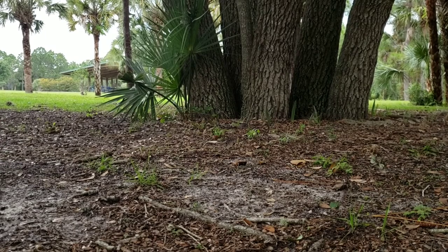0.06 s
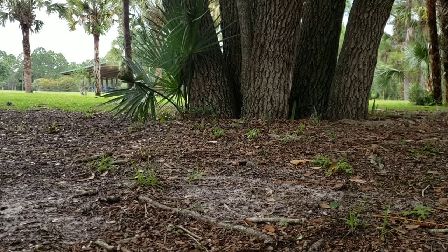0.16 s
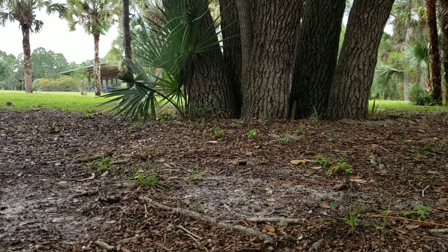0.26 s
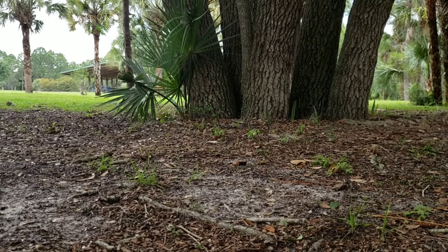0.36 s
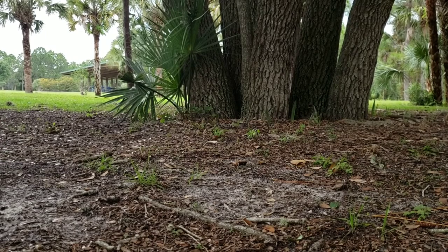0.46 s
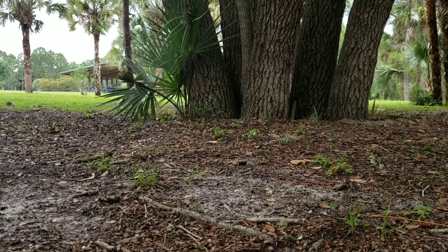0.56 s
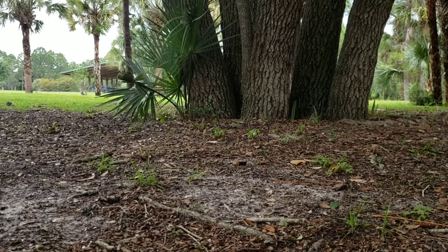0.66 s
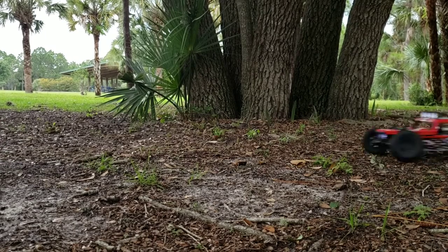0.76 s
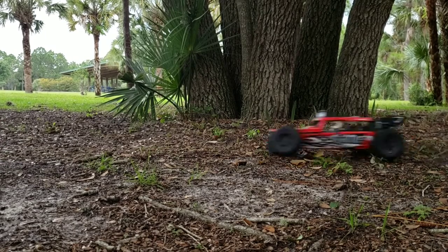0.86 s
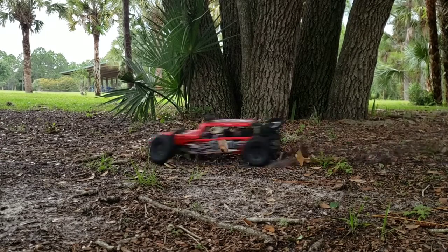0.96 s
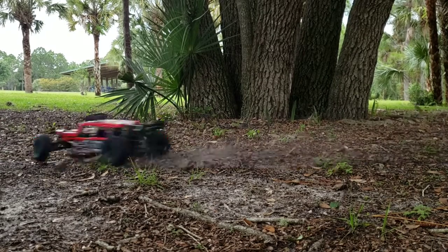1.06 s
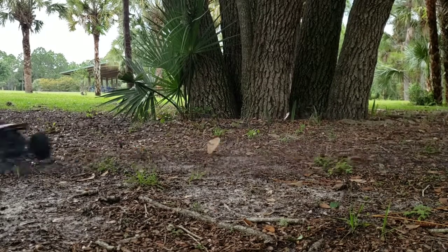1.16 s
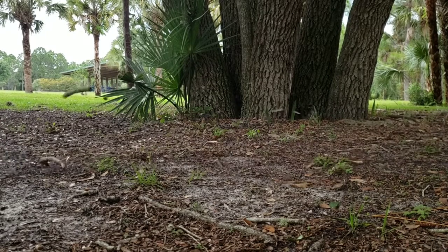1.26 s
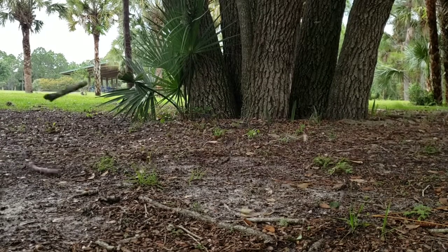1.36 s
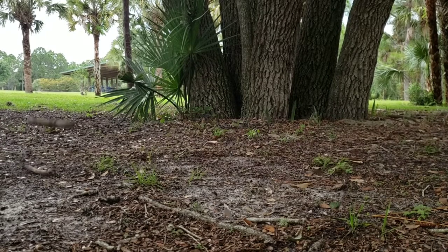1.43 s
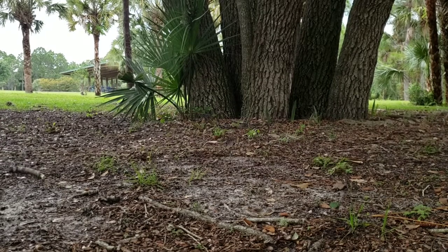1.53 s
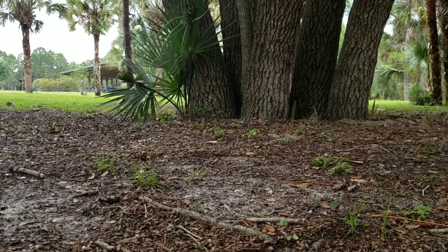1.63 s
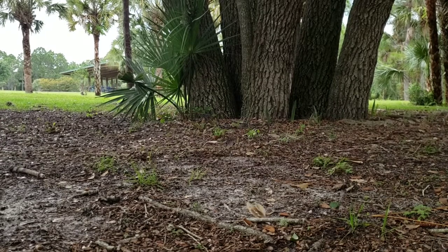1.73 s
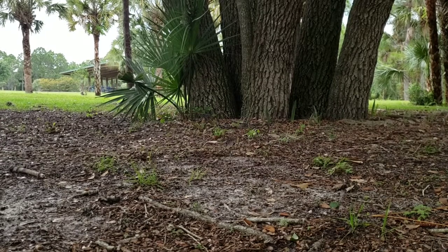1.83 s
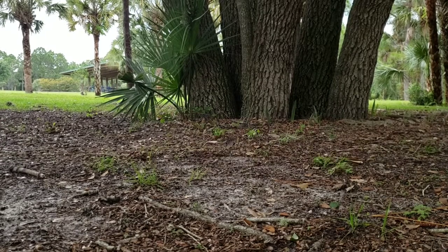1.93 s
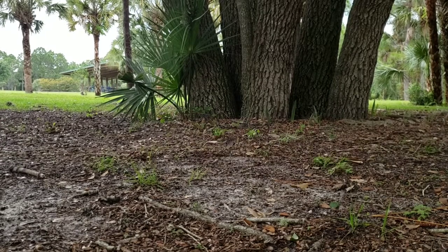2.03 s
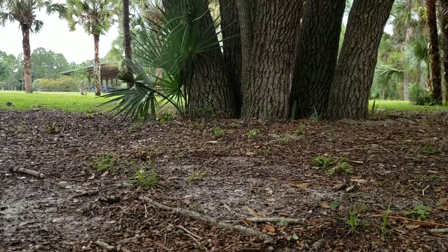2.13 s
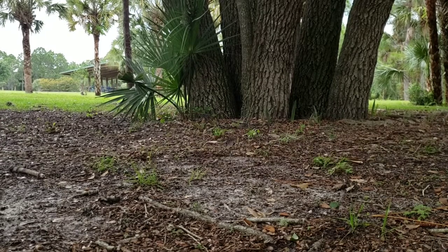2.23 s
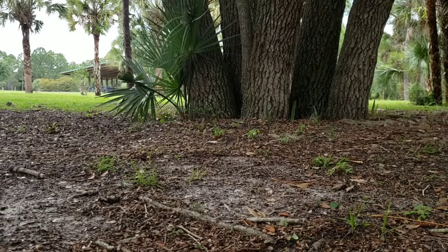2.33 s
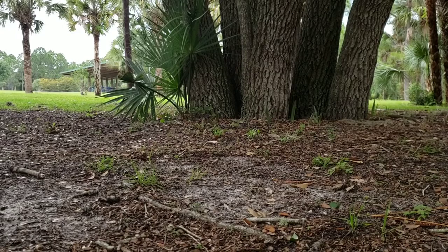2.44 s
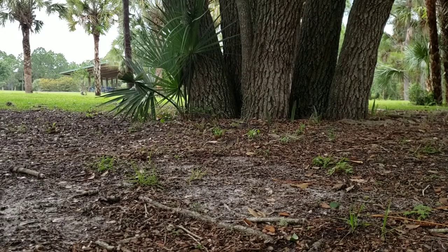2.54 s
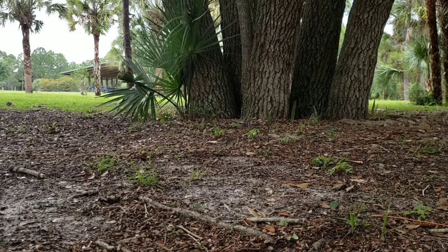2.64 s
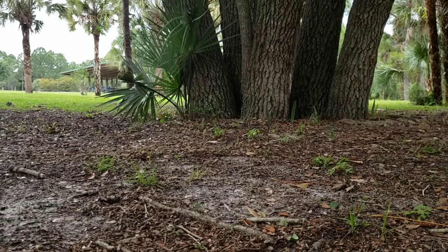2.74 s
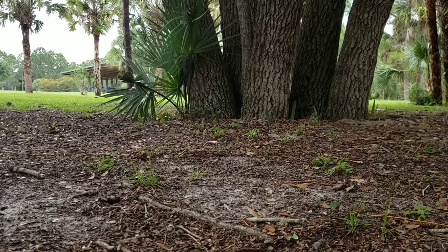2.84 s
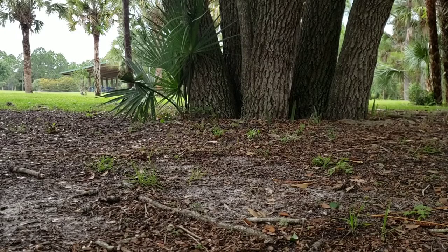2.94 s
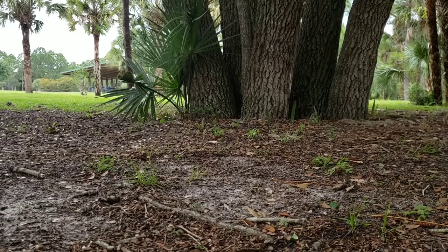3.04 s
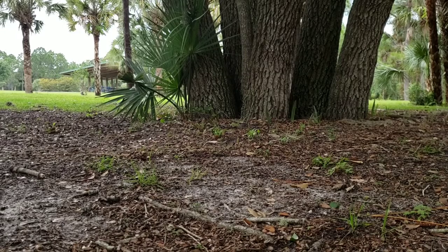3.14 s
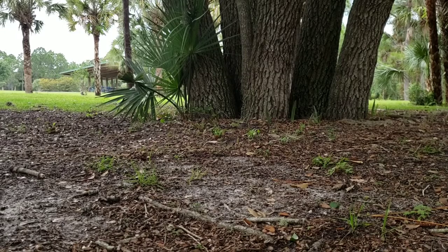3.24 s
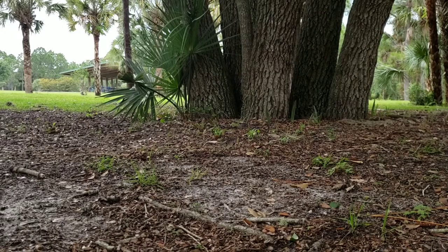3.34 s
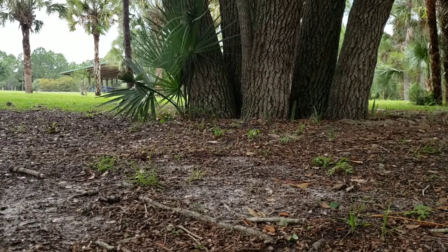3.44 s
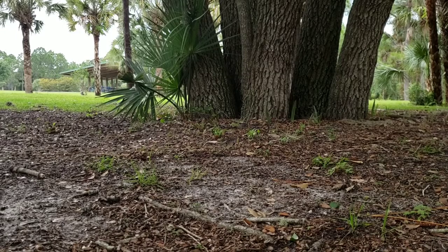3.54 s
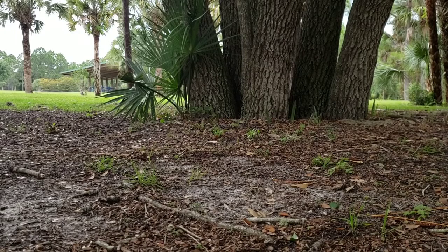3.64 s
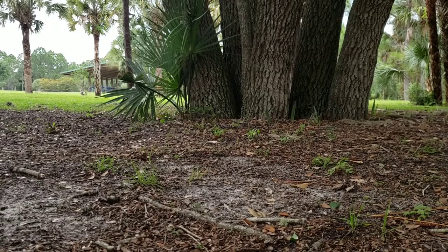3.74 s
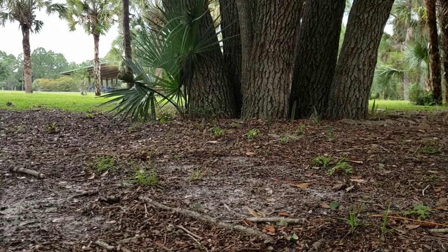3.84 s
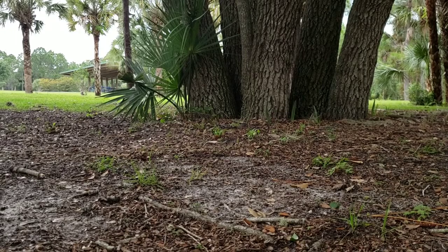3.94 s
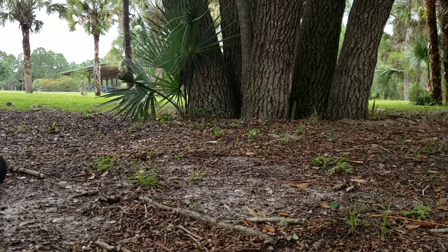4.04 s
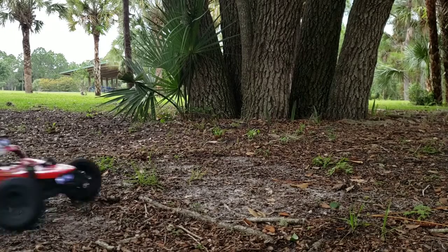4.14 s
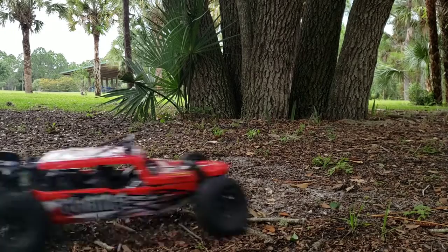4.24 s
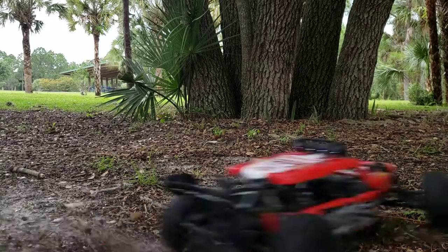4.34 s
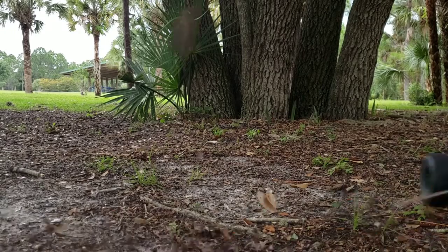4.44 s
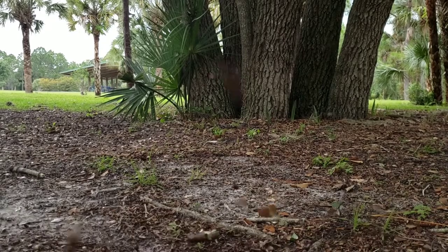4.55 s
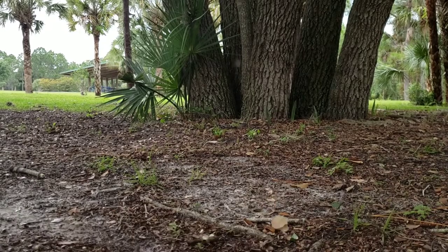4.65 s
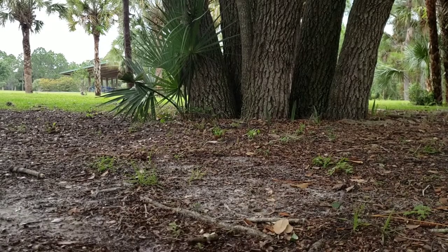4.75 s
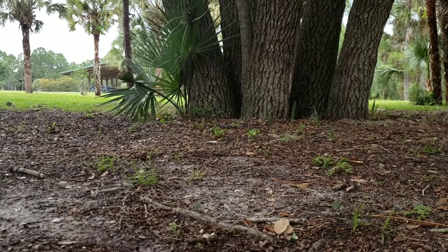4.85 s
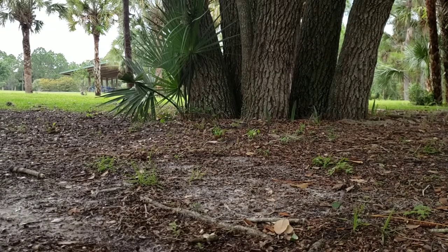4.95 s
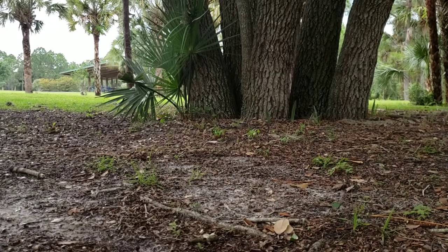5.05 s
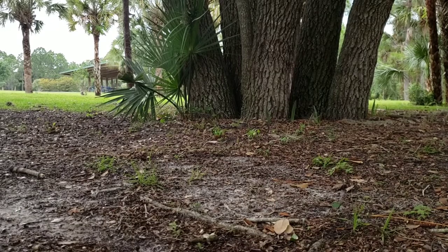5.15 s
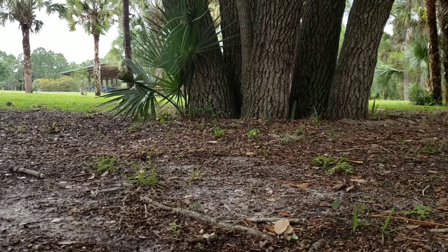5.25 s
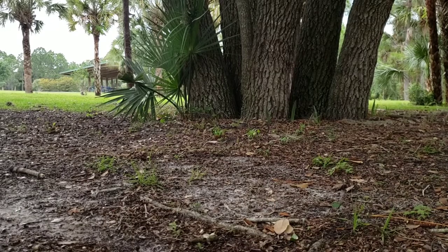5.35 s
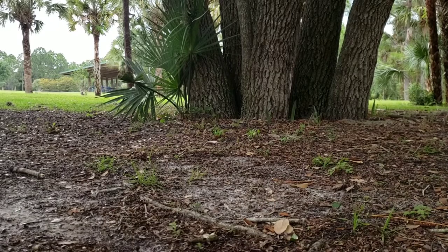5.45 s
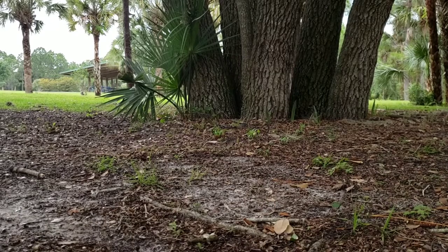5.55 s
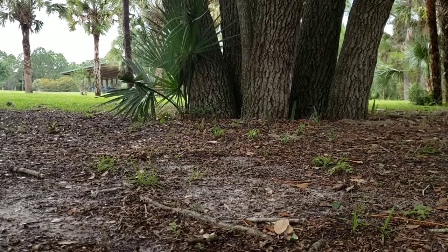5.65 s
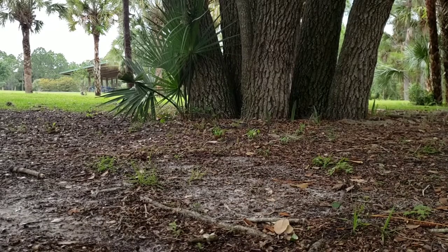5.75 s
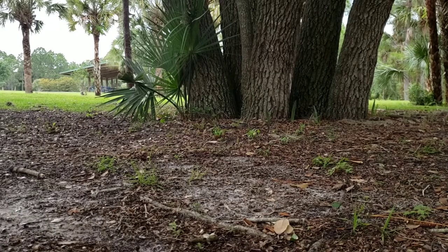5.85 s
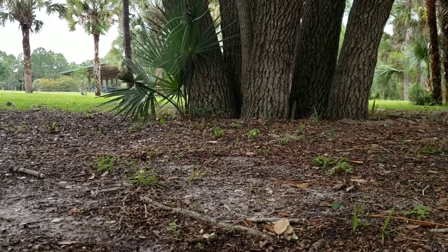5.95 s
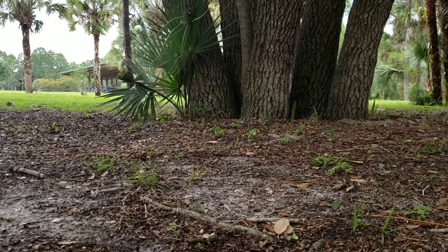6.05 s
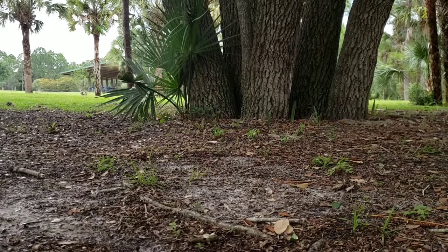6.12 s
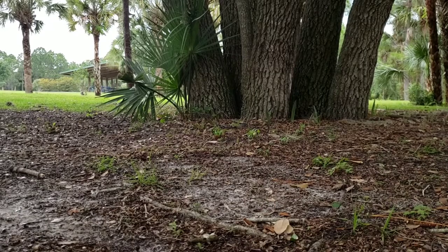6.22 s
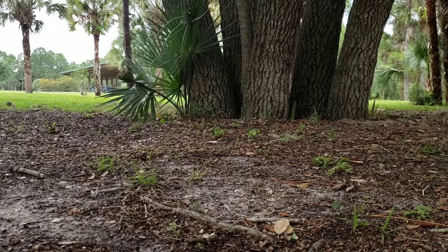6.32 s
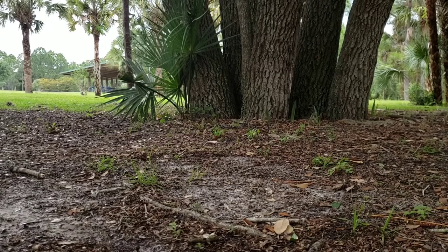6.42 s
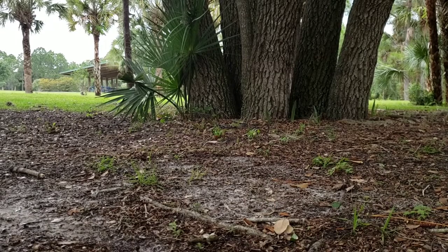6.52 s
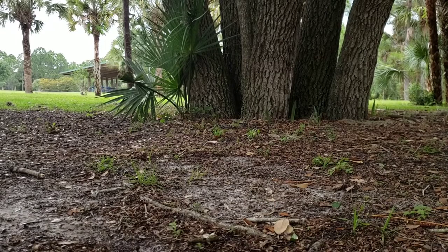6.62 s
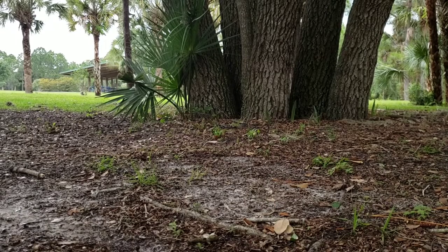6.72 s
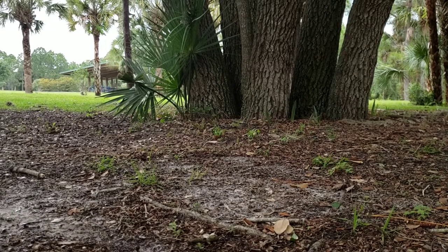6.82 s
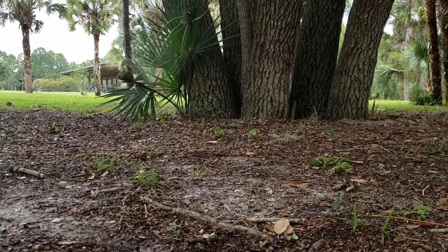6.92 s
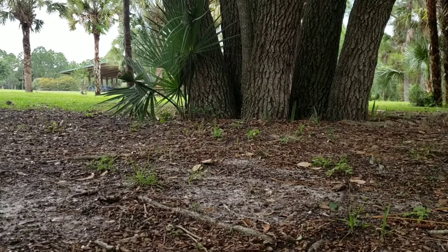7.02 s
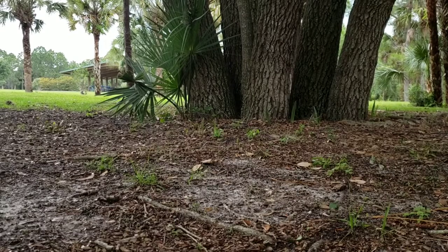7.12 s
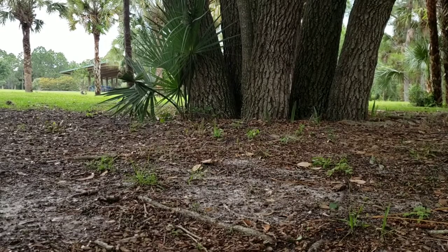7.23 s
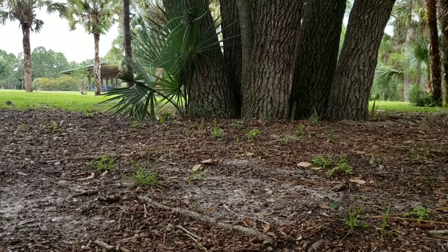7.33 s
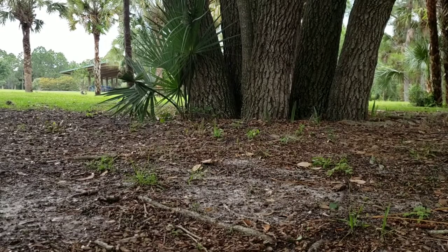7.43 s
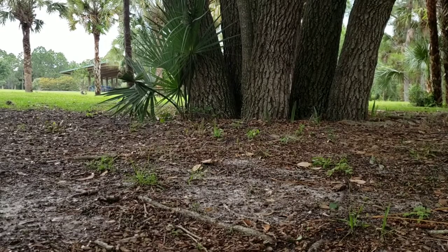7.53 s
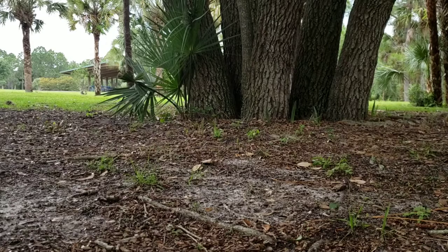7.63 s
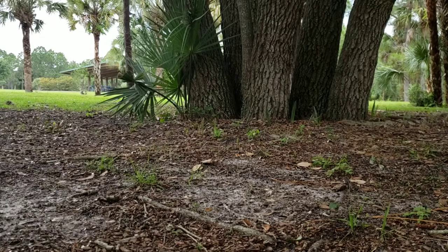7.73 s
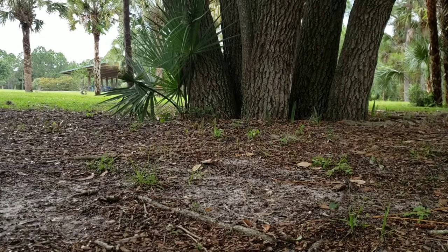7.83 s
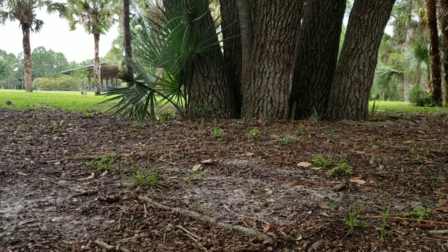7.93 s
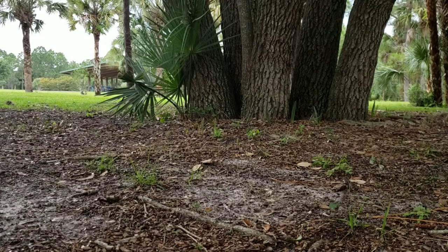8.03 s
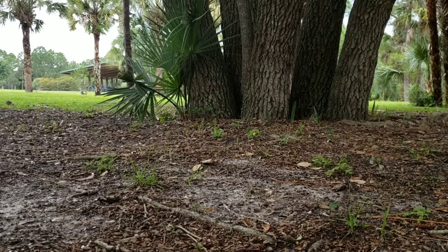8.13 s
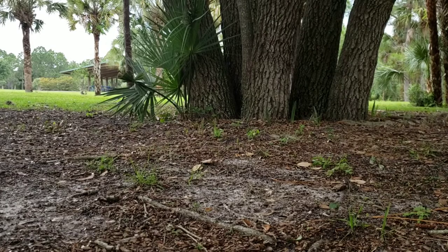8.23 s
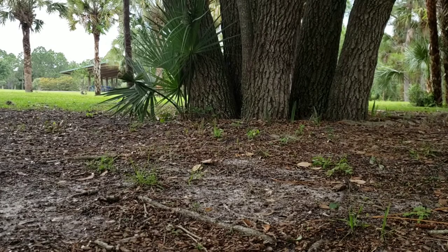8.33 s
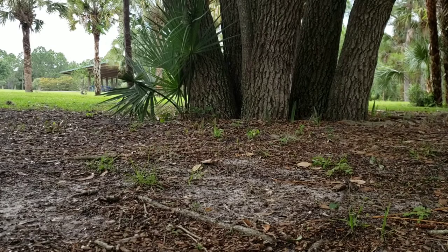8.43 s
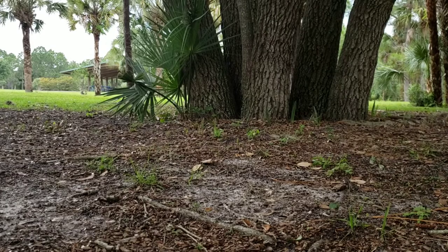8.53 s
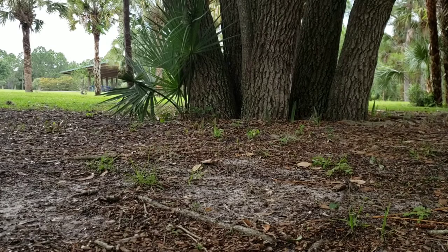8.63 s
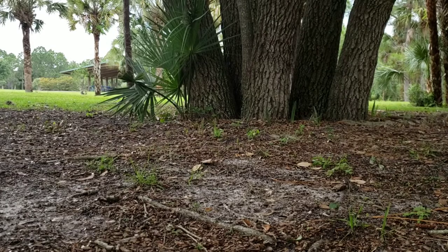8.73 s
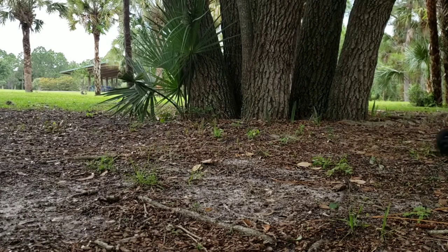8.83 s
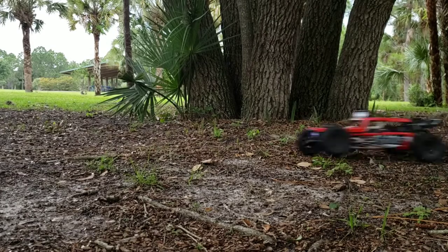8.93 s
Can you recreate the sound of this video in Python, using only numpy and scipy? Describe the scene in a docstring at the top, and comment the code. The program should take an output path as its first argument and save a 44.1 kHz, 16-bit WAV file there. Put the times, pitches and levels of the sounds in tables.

```python
"""A small electric buggy races over sandy leaf litter near a low microphone; far off an engine drones.
It passes at 1 s: gear whine, speed-controller whistle, churning tyres, flung grit. It returns and passes
closer at 4.4 s, and a clod thumps the right microphone port. Crumbs and loose dirt settle in the lull.
At 6.9 s the sound drops out for a moment, then the buggy approaches a third time."""
import sys
import numpy as np
from scipy import signal
from scipy.fft import rfft, irfft, next_fast_len
from scipy.io import wavfile
from scipy.ndimage import uniform_filter1d, map_coordinates

SR = 44100
rng = np.random.default_rng(int(sys.argv[2]) if len(sys.argv) > 2 else 0)


def output_pcm(signal):
    """Save a mono or channel-first signal as 16-bit PCM at the path in sys.argv[1].

    Samples are clipped to [-1, 1] before scaling.
    """
    pcm = np.clip(np.atleast_2d(signal).T, -1, 1) * 32767
    wavfile.write(sys.argv[1], SR, np.round(pcm).astype(np.int16))


N = 396018
TIME_S = np.arange(N) / SR
PORT_LAG_S = 21 / 44100
GRAIN_HOLD = .975  # share of a grain's envelope kept per sample

# gear mesh, one list per approach: (time [s], pitch [Hz], level [dB], second harmonic [dB])
GEAR_MESH = [
    [(0.0, 668.6, -39, -46), (0.13, 787, -43, -50), (0.25, 996, -39.5, -42), (0.41, 1243, -37, -43.5),
     (0.435, 1554, -29, -60), (0.447, 1910, -44, -57), (0.457, 2207, -30, -57), (.485, 2207, -34, -55),
     (0.495, 1444, -28, -50), (.53, 1812, -35.5, -36), (.545, 2177, -28, -48), (0.58, 2424, -38, -50),
     (0.67, 2515, -38, -42), (0.8, 2490, -35, -45), (0.89, 2450, -35, -41), (0.93, 2526, -45, -46),
     (1.0, 2639, -44, -35), (1.07, 2370, -31, -32), (1.12, 2447, -34, -36), (1.17, 2658, -48, -41),
     (1.2, 2610, -46, -42), (1.23, 2550, -44, -32), (1.27, 2480, -34, -40), (1.35, 2342, -45, -53)],
    [(2.44, 400.6, -62, -73), (2.485, 642, -52, -68), (2.53, 1159, -39.5, -59), (2.57, 1200, -51, -68),
     (2.62, 1270, -43, -68), (2.68, 1400, -36, -72), (2.72, 1750, -43, -70), (2.78, 1948, -53, -69),
     (2.81, 2055, -64, -72), (2.88, 2274, -66, -70), (2.92, 2390, -54, -70), (3.2, 2502, -54, -76),
     (3.39, 2434, -48, -72), (3.42, 2128, -48, -72), (3.46, 2874, -44, -70), (3.6, 1953, -34.5, -60),
     (3.7, 2400, -39, -66), (3.73, 1522, -45, -60.5), (3.8, 1750, -37, -52), (3.825, 1444, -46, -36),
     (3.89, 1847, -37, -35), (3.91, 2150, -27, -46), (3.94, 2420, -31, -40), (3.975, 2400, -38, -42),
     (3.99, 2292, -29, -34), (4.04, 2319, -28.5, -32), (4.13, 2675, -43, -29), (4.2, 2581, -34, -34),
     (4.25, 2403, -27.5, -35), (4.28, 2520, -36, -35), (4.33, 2600, -28, -25), (4.355, 2547, -30.5, -27),
     (4.372, 2330, -30.5, -23.5), (4.39, 2500, -32.5, -18.5), (4.41, 2605, -31, -32),
     (4.435, 2374, -25, -32), (4.47, 2407, -32.5, -26), (4.5, 2610, -40, -25.5), (4.53, 2560, -41, -36),
     (4.56, 2445, -48, -52)],
    [(6.915, 1534, -39, -64), (6.999, 1471, -51, -63), (7.029, 1476, -42, -62), (7.041, 1582, -45, -62),
     (7.103, 1431, -40, -62), (7.149, 1651, -49, -62), (7.163, 1500, -41, -62), (7.203, 1547, -54, -62),
     (7.211, 1431, -50, -62), (7.259, 1510, -39, -62), (7.309, 1629, -48, -62), (7.321, 1757, -44, -62),
     (7.367, 1603, -42, -62), (7.389, 1748, -42.5, -60), (7.451, 1528, -39.5, -62), (7.493, 1761, -42, -62),
     (7.519, 1662, -40, -62), (7.585, 1797, -44, -62), (7.601, 1711, -40.5, -57), (7.645, 1784, -42, -59),
     (7.685, 1949, -55, -62), (7.737, 1787, -39, -60), (7.765, 1924, -49, -58), (7.779, 1789, -46, -62),
     (7.795, 1985, -49, -64), (7.837, 1989, -44, -65), (7.845, 1727, -30, -62),
     (7.86, 1956, -49, -66)] + [(8.02, 2350, -42, -68), (8.2, 2302, -52, -66), (8.32, 2299, -38, -66),
     (8.37, 1904, -54, -66), (8.4, 1534, -34, -64), (8.52, 1250, -38, -42), (8.65, 1583, -38.5, -51),
     (8.8, 1542, -37, -60), (8.98, 1549, -38.5, -63)],
]


def amp(db):
    return 10 ** (np.asarray(db) / 20)


def unit(x):
    return x / np.sqrt(np.mean(x ** 2) + 1e-20)


def along(points, hz):
    """Interpolate (frequency [Hz], value) points on a log axis."""
    f, v = np.transpose(points)
    return np.interp(np.log(hz + 1), np.log(f + 1), v)


def curves(rows):
    """One value per sample for each column after the time."""
    s, *cols = np.transpose(rows)
    return [np.interp(TIME_S, s, c) for c in cols]


def span(start_s, end_s, fade_s=0.029):
    """1 inside the span, fading to 0 outside."""
    return np.clip(np.minimum(TIME_S - start_s, end_s - TIME_S) / fade_s + 1, 0, 1)


def wobble(rate_hz):
    """Smooth random curve with knots at rate_hz."""
    coarse = np.arange(0, N + 16, 16)
    knots = rng.standard_normal(int(N * rate_hz / SR) + 5)
    return np.interp(np.arange(N), coarse, map_coordinates(knots, [coarse * rate_hz / SR]))


def fuzz(width_hz):
    """Wandering complex gain, rms near 1: spreads a line into a band."""
    knots = rng.standard_normal((int(N * width_hz / SR) + 2, 2)) @ [1, 1j]
    return np.interp(TIME_S * width_hz, np.arange(len(knots)), knots) / 1.15


def filtered(x, response):
    m = next_fast_len(N + SR // 4)
    return irfft(rfft(x, m) * response(np.fft.rfftfreq(m, 1 / SR)), m)[..., :N]


def coloured(x, spectrum):
    """Filter by (frequency [Hz], gain [dB]) points."""
    return filtered(x, lambda hz: amp(along(spectrum, hz)))


def heading():
    """Bearing of a car on straight runs: sideways over full distance, -1 left to 1 right."""
    # sweeps: (middle [s], half width [s], bearing after)
    moves = [(.988, .33, -.82), (3.95, .3, -.6), (4.41, .12, 1.02), (5.65, .05, 0), (6.895, .002, .97),
             (9.0, .2, -.6)]
    start = .95
    before = [start] + [row[2] for row in moves]
    return start + sum((after - was) * (.5 + .5 * (TIME_S - s) / np.hypot(TIME_S - s, half_s))
                       for (s, half_s, after), was in zip(moves, before))


def at_ports(streams, alike, shade_db):
    """Common stream 0 reaches the far port late; the housing shades the left port from the right."""
    bearing = heading()
    lag = bearing * PORT_LAG_S * SR / 2
    common = np.array([map_coordinates(streams[0], [np.arange(N) - k * lag], order=3) for k in (1, -1)])
    pair = np.sqrt(alike) * common + np.sqrt(1 - alike) * streams[1:]
    shade = shade_db * np.clip(0.35 + bearing, 0, 1.2)
    return pair * amp([-.7 * shade, 0.47 * shade])


def surroundings():
    """Far engine with a half order, traffic rumble, a faint tone in the lull and thin air hiss."""
    # far engine, two stretches: (time [s], firing rate [Hz], engine [dB], traffic [dB])
    drone = [
        [(0.0, 78.6, -49.5, -41.5), (0.5, 94.4, -57, -45), (1.2, 98, -60, -40.5), (1.8, 75.3, -61, -45),
         (2.5, 84, -55.5, -52.5), (3.4, 84.3, -56, -45), (3.68, 75.9, -46.5, -47.5), (3.97, 97.27, -48, -42.5),
         (4.45, 96, -51.5, -35.5)],
        [(4.62, 66.9, -67, -61), (4.96, 74.45, -63.5, -67), (5.78, 77.5, -60, -63.5),
         (7.0, 77.84, -51.5, -47.5), (7.6, 77.93, -53.5, -43.5), (7.86, 93, -54, -46), (8.2, 73.2, -63, -43),
         (8.98, 80.1, -52, -37)],
    ]
    # traffic spectrum: (frequency [Hz], gain [dB])
    traffic_spectrum = [(12, -85), (20, -45), (60, -8.5), (80, -11.5), (103, -13), (160, -15.5),
                        (400, -35.5), (520, -86.5), (880, -120)]
    # air spectrum: (frequency [Hz], gain [dB])
    air_spectrum = [(150, -34.5), (250, -13), (450, -27.5), (900, -37), (2500, -46), (5500, -29.5),
                    (8400, -43), (12300, -29.5), (16200, -35.5)]
    firing_hz, engine_db, traffic_db = curves(sum(drone, []))
    crank = np.pi * np.cumsum(firing_hz * (1 + 0.013 * wobble(6.6))) / SR
    engine = sum(amp(engine_db + db + 1.8 * wobble(11)) * np.sin(k * crank)
                 for k, db in zip((2, 3, 4, 6), (3.5, -11.5, -19.0, -20.5)))
    traffic = amp(traffic_db - 4.5) * unit(coloured(rng.standard_normal(N), traffic_spectrum))
    tone_db = 0.35 * traffic_db - 66.5 + 1.3 * wobble(17)
    tone = amp(tone_db) * np.sin(2 * np.pi * 1755 * TIME_S) * span(4.7, 6.9)
    air = amp(0.6 * traffic_db - 43) * unit(coloured(rng.standard_normal((2, N)), air_spectrum))
    return (engine + traffic + tone) * amp([[-.6], [.6]]) + air * amp([[-2.5], [2.5]])


def crumbs(per_s=32):
    """Crumbs drop through the leaves: faint clumped ticks, dull or bright."""
    chance = per_s / SR * amp(2.7 * wobble(10)) * span(5.1, 6.88)
    drops = (rng.random((2, N)) < chance) * amp(-83 + 1.4 * rng.exponential(size=(2, N)))
    puffs = signal.lfilter([1], [1, -.9965], drops)[:, None] * rng.standard_normal((2, 2, N))
    dull = [(400, -20), (900, 13.0), (2200, 13.5), (4500, -29), (7000, -36)]
    bright = [(2500, -34), (5500, 0.0), (8400, -21), (12300, 3.0), (16200, -21.0)]
    return coloured(puffs[0], dull) + coloured(puffs[1], bright)


def dirt_slides(attack_s=0.0035, fall_db_per_s=353):
    """Envelope of loose dirt sliding in the lull."""
    # slides: (time [s], hold [s], level [dB])
    slides = [(5.77, .02, -90.5), (5.83, 0.041, -88.5), (5.914, 0.018, -92.5), (6.139, 0.048, -96),
              (6.311, 0.108, -71), (6.474, 0.017, -83.5), (6.675, 0.0042, -72.5)]
    return sum(amp(db - fall_db_per_s * np.clip(TIME_S - s - hold_s, 0, None))
               * np.clip((TIME_S - s) / attack_s, 0, 1) for s, hold_s, db in slides)


def pebbles(t60_s=0.061):
    """Pebbles rap something hollow, which rings briefly."""
    # raps: (time [s], pitch [Hz], level [dB])
    raps = [(1.508, 1700, -30), (4.632, 1719, -40.5), (4.752, 1620, -41)]
    return sum(amp(db - 60 * np.abs(TIME_S - s) / t60_s) * (TIME_S > s)
               * np.sin(2 * np.pi * hz * (TIME_S - s)) for s, hz, db in raps)


def grit(puff_t60_s=.015, thud_t60_s=.04):
    """Grit and twigs land or snap: a bright puff over a dull thud, late at the far port."""
    # landings: (time [s], level [dB], left minus right [dB], thud offset [dB])
    landings = [(0.0493, -30, -15, -7), (0.8889, -14, -5.5, -0.5), (0.9779, -17, -8.5, -19.5),
                (1.254, -12, -2, -23), (1.5089, -23.5, -4.5, -3), (1.606, -24, 3, -29),
                (1.7768, -27.5, 0, -16), (1.836, -26, 6.5, -40), (2.2228, -41.5, 3, 2.5),
                (2.484, -41.5, 0.5, -5), (3.5974, -29.5, 2, -8), (4.4148, -3.5, -2, -9.5),
                (4.435, -8.5, -8, -21), (4.4792, -7, -7.5, -24), (4.529, -14, -12, -35),
                (4.5422, -19, -3.5, -26), (4.5471, -17.5, -14.5, -24), (4.569, -17.5, -7, -27.5),
                (4.587, -18.5, -3, -23), (4.6165, -24.5, -11, -17.5), (4.715, -28, -6.5, -20.5),
                (4.75, -38.5, -7.5, -3.5), (5.07, -47, -11.5, -15), (5.8298, -63.5, -8, -6.5),
                (5.9197, -58.5, -2, -19.5), (6.313, -50, -4.5, -20.5), (6.378, -47.5, 0.5, -23.5),
                (6.678, -39.5, -9, -36.5)]
    t = np.arange(SR // 40) / SR
    lag = heading() * PORT_LAG_S * SR / 2
    bright, dull = np.zeros((2, 2, N + len(t)))
    for s, db, pan_db, thud_db in landings:
        puff, knock = rng.standard_normal((2, len(t)))
        knock[0] = -7  # snap of first contact
        for port, k in enumerate((1, -1)):
            at = round(s * SR + k * lag[round(s * SR)])
            bright[port, at:][:len(t)] += amp(db + k * pan_db / 2 - 4 - 60 * t / puff_t60_s) * puff
            dull[port, at:][:len(t)] += amp(db + thud_db + 2 - 60 * t / thud_t60_s) * knock
    puff_spectrum = [(1500, -29.0), (5500, 1.0), (8500, -16.5), (12000, 8.5), (16000, -10.5)]
    thud_spectrum = [(150, -25.0), (500, 6.0), (1800, 3.5), (3500, -25.5)]
    return coloured(bright[:, :N], puff_spectrum) + coloured(dull[:, :N], thud_spectrum)


def clod(at_s=4.5266, db=.6, sway_hz=55, life_s=.022):
    """A blow on the right port: the membrane jumps inward, then sways."""
    t = np.clip(TIME_S - at_s, 0, None)
    phase = 2 * np.pi * sway_hz * t + 2.5 * (1 - np.exp(-t / .0025))
    decay = .6 * np.exp(-(t / life_s) ** 2) + .4 * np.exp(-t / .0012) + .04 * np.exp(-t / .05)
    attack = np.clip(t / .00015, 0, 1)
    return -amp([[db - 40], [db]]) * np.cos(phase) * decay * attack


def tyre_levels():
    """Rattle, rumble and hiss levels [dB] of the tyres plus sliding dirt."""
    # tyres, one list per approach: (time [s], rattle [dB], rumble offset [dB], hiss offset [dB])
    approaches = [
        [(0.0, -52, -4.5, 0.5), (0.38, -44.5, -5, 1.5), (0.45, -39.5, 4, 3), (0.48, -33, -4.5, 0.5),
         (0.58, -35, 3, 8.5), (0.72, -34.5, 2.5, 7), (0.91, -36, 6.5, 9), (0.93, -38, 3.5, 9),
         (1.0, -33.5, 3, 7.5), (1.05, -32.5, 3, 8.5), (1.115, -32, 2, 8.5), (1.14, -36.5, 3.5, 12.5),
         (1.17, -37.5, -7.5, 8.5), (1.19, -39.5, 5, 8), (1.22, -32, -2.5, 6), (1.33, -39, 6.5, 4.5),
         (1.57, -48.5, 2, 3.5), (1.6, -44, 1, 3.5), (1.62, -56.5, 9.5, 9.5), (1.81, -57, -0.5, 7.5),
         (2.2, -70, 5.5, 4)],
        [(2.25, -66, 6, 5.5), (2.5, -61, 10, -1), (2.55, -56.5, -1, -1), (2.8, -54.5, 6.5, 5.5),
         (3.62, -46.5, -0.5, 0.5), (3.66, -46.5, -6, 4), (3.78, -41.5, 1.5, -2), (3.84, -35.5, -11, -2.5),
         (3.85, -39, 2, 0.5), (3.94, -33, 3, 3), (4.03, -31.5, -0.5, 0.5), (4.04, -34.5, 2.5, 4),
         (4.14, -34, 1, 2.5), (4.165, -28, 3, 1.5), (4.19, -30.5, 1.5, 3.5), (4.25, -27.5, 2, 2.5),
         (4.31, -26.5, 2, 2), (4.35, -21, -1, 2), (4.39, -26.5, -5, 3.5), (4.4, -24, -8, 4),
         (4.42, -24.5, 3, 7.5), (4.48, -29.5, -8, 9), (4.51, -31.5, -7, 9)],
        [(6.905, -55, 4, 3.5), (6.97, -56, 2, 0.5), (7.11, -50.5, -3, 2.5), (7.14, -53.5, -1, 2),
         (7.69, -52.5, 0, 4.5), (8.42, -43, 2.5, 4.5), (8.45, -42.5, 3, 7), (8.49, -40.5, 2, 4),
         (8.495, -39.5, 4, 8.5), (8.51, -37.5, 5, 1), (8.58, -39, 2, 3.5), (8.62, -35, -4, 2),
         (8.63, -42.5, 7, 8.5), (8.66, -39.5, -3, 7.5), (8.67, -38.5, 8, 5), (8.79, -38.5, 4.5, 7.5),
         (8.96, -37.5, 1.5, 6.5), (8.97, -33.5, -3, 3.5), (8.98, -39.5, 4, 9.5)],
    ]
    # second pass fading: same columns
    leaving = [(4.56, -43.5, -1.5, 5.8), (4.742, -47, -4.5, 2.7), (4.824, -64.5, 5, 5.4),
               (5.158, -76, -11, 6.7), (5.416, -99, 16, 18.5), (5.5, -101, 13, 4.4)]
    db, rumble_db, hiss_db = curves(sorted(sum(approaches, []) + leaving + [(6.9, -100, 4.3, 5)]))
    slides = dirt_slides()
    return [20 * np.log10(amp(db + offset) + slides) for offset in (0, rumble_db, hiss_db)]


def crunch(snaps_per_s=150):
    """Leaves and twigs break under the tyres in clumps of coarse snaps."""
    # snap spectrum: (frequency [Hz], gain [dB])
    spectrum = [(150, -30), (400, 0.5), (1200, -1), (3000, -6.5), (5500, -10.5), (8500, -22),
                (12000, -11.5), (16000, -25)]
    chance = snaps_per_s / SR * amp(5 * wobble(22))
    snaps = (rng.random(N) < chance) * amp(2.5 * rng.exponential(size=N))
    cracks = signal.lfilter([1], [1, -GRAIN_HOLD], snaps) * rng.standard_normal((3, N))
    return unit(coloured(cracks, spectrum))


def churn(spectrum, grains_per_s, spread_db, lumps_db):
    """Churned ground: three unrelated grainy noises that swell together in quick lumps."""
    hits = (rng.random(N) < grains_per_s / SR) * amp(spread_db * rng.exponential(size=N))
    grains = signal.lfilter([1], [1, -GRAIN_HOLD], hits)
    lumps = amp(lumps_db * (wobble(14) + wobble(70) + wobble(300)))
    return unit(coloured(lumps * (1 + .5 * grains) * rng.standard_normal((3, N)), spectrum))


def tyre_rattle(level_db, far_db=-52, near_db=-43):
    """Midrange churn, more alike at the two ports as the car comes close."""
    # power common to both ports: (frequency [Hz], far share [0-1], near share [0-1])
    common = [(800, .75, .85), (1500, .75, .98), (3600, .45, .98), (4600, .35, .7), (6500, .15, .2)]
    # rattle spectrum: (frequency [Hz], gain [dB])
    spectrum = [(590, -35), (1000, -0.5), (1610, -1), (1960, -2), (2450, -2.5), (3730, -4.5), (5060, -3.5),
                (8500, -16), (11000, -46), (18700, -120)]

    def weights(hz, column):
        share = along([(row[0], row[column]) for row in common], hz)
        return np.sqrt(2 * np.array([share, 1 - share, 1 - share]))

    streams = churn(spectrum, grains_per_s=90, spread_db=0, lumps_db=1.21)
    far = filtered(streams, lambda hz: weights(hz, column=1))
    near = filtered(streams, lambda hz: weights(hz, column=2))
    closeness = np.clip((level_db - far_db) / (near_db - far_db), 0, 1)
    return (1 - closeness) * far + closeness * near


def tyres(rattle_db, rumble_db, hiss_db, shadow_hz=6500):
    """Rumble, rattle, crunch and hiss; the housing's shadow is deep above shadow_hz."""
    # rumble spectrum: (frequency [Hz], gain [dB])
    rumble_spectrum = [(71, -33.5), (120, -10.5), (206, -4.5), (383, 1.5), (658, 1), (1330, -5.5),
                       (1600, -14.5), (2080, -27), (3520, -120)]
    # hiss spectrum: (frequency [Hz], gain [dB])
    hiss_spectrum = [(4410, -22), (7500, -15.5), (8680, -29), (9850, -11), (12300, 0.5), (13800, -10.5),
                     (15500, -12), (16000, -30.5), (16300, -27)]
    rumble = churn(rumble_spectrum, grains_per_s=27, spread_db=-1, lumps_db=1.3)
    rattle = tyre_rattle(rattle_db)
    treble = filtered(rattle, lambda hz: 1 / (1 + (shadow_hz / (hz + 1)) ** 10))
    rattle_gain = amp(rattle_db + 2.5 + wobble(18))
    hiss = churn(hiss_spectrum, grains_per_s=160, spread_db=3, lumps_db=.9)
    return (at_ports(amp(rumble_db - 0.63 + 1.2 * wobble(25)) * rumble, alike=.9, shade_db=.5)
            + at_ports(rattle_gain * (rattle - treble), alike=.5, shade_db=.5)
            + at_ports(rattle_gain * treble, alike=.5, shade_db=5.5)
            + at_ports(amp(rumble_db - 6) * crunch(), alike=.98, shade_db=.5)
            + at_ports(amp(hiss_db + 2.5 + .8 * wobble(16)) * hiss, alike=.4, shade_db=8))


def trunk_echoes(x, t60_s=0.28):
    """Scatter from tree trunks and ground blurs fast glides."""
    t = np.arange(SR // 5) / SR
    tail = rng.standard_normal((2, len(t))) * amp(-60 * t / t60_s)
    return signal.fftconvolve(x[None], tail / np.linalg.norm(tail[0]), axes=1)[:, :N]


def shell(hz):
    """Frequency response of the ringing body shell."""
    # resonances: (centre [Hz], width [Hz], gain [dB])
    modes = [(1194, 91, 4.5), (1478, 45, 4.5), (1670, 44, 2.5), (2030, 70, 1)]
    return 1 + sum(amp(db) * 1j * hz * width / (centre ** 2 - hz ** 2 + 1j * hz * width)
                   for centre, width, db in modes)


def rasp(tyres_db, db_per_tyre_db=0.66):
    """Shafts and cogs chatter in a broad band that loosely follows the mesh pitch, ringing the shell."""
    # drivetrain load: (start [s], end [s], rasp with tyres at -40 dB [dB])
    loads = [(0, 0.449, -37), (0.497, 1.2, -40), (1.26, 2.1, -44), (2.225, 2.901, -38), (2.95, 3.75, -37),
             (3.8, 4.336, -44.5), (4.6, 5.43, -51.5), (6.91, 7.702, -45), (7.75, 8.399, -37.5),
             (8.45, 8.98, -42)]
    load = sum(amp(db) * span(start, end, fade_s=0.02) for start, end, db in loads)
    mesh_hz = curves(sum(GEAR_MESH, []))[0]
    centre_hz = .74 * np.clip(uniform_filter1d(mesh_hz, size=4000), 1900, 2700)
    carrier = np.exp(2j * np.pi * np.cumsum(centre_hz) / SR)
    chatter = np.array([(fuzz(1100) * carrier).real for _ in range(3)])
    return load * amp(db_per_tyre_db * (tyres_db + 40) + 1.5 * wobble(40)) * unit(filtered(chatter, shell))


def whistle(tyres_db, chop_hz=5795):
    """At part throttle the controller chops the motor current at a nearly steady rate."""
    # part throttle: (start [s], end [s], offset from tyres [dB])
    throttle = [(0, 0.125, 9), (0.198, 0.437, 6), (2.3, 3.7, -10), (7.03, 7.13, -3.5), (7.201, 7.45, -6),
                (7.6, 8.981, -6.5)]
    phase = 2 * np.pi * np.cumsum(chop_hz * (1 + 0.00181 * wobble(80) + 0.00114 * wobble(2))) / SR
    on = sum(amp(db) * span(start, end, fade_s=0.088) for start, end, db in throttle)
    gain = on * amp(tyres_db + wobble(3) + 1.5 * wobble(14))
    return gain * ((.85 + .45 * fuzz(100)) * np.exp(1j * phase)).imag


def wheelspin(start_ratio=.9):
    """A wheel slips and races: the gears yelp upward."""
    # slips: (time [s], length [s], top pitch [Hz], level [dB])
    slips = [(0.467, 0.041, 2800, -30), (0.493, 0.028, 3550, -31), (3.43, 0.068, 2850, -51),
             (3.74, 0.081, 2960, -33.5), (3.743, 0.046, 3650, -43), (8.244, 0.053, 2486, -39),
             (8.357, 0.036, 2690, -42), (8.468, 0.055, 2700, -43), (8.502, 0.051, 3170, -34)]
    smear, out = fuzz(280), np.zeros(N)
    for s, length_s, top_hz, db in slips:
        u = np.clip((TIME_S - s) / length_s, 0, 1)
        phase = 2 * np.pi * top_hz * length_s * (start_ratio * u + (1 - start_ratio) * (u ** 2 - u ** 3 / 3))
        out += amp(db) * np.sin(np.pi * u) * (smear * np.exp(1j * phase)).imag
    return out


def regrip():
    """The wheel bites again: the gears yelp downward."""
    # bites: (time [s], length [s], start pitch [Hz], end pitch [Hz], level [dB])
    bites = [(3.14, .09, 2450, 2085, -51), (3.4, 0.038, 2550, 2110, -50), (3.48, .05, 2814, 2327, -49),
             (3.533, 0.082, 2400, 1960, -54), (3.79, .06, 2950, 1900, -37)]
    smear, out = .4 + .8 * fuzz(260), np.zeros(N)
    for s, length_s, from_hz, to_hz, db in bites:
        u = np.clip((TIME_S - s) / length_s, 0, 1)
        phase = 2 * np.pi * length_s * (from_hz * u + (to_hz - from_hz) * u ** 2 / 2)
        out += amp(db) * np.sin(np.pi * u) * (smear * np.exp(1j * phase)).imag
    return out


def gears(teeth=41):
    """Tooth mesh: an off-centre gear wavers pitch and level once a turn; bumps smear the whine."""
    # bumpy ground: (start [s], end [s], roughness [0-1])
    bumps = [(.44, .6, .5), (.72, 1.0, .3), (1.15, 1.4, .6), (2.85, 3.32, .25), (3.42, 3.72, .9),
             (3.78, 4.06, .35), (4.1, 4.6, .3), (7.85, 8.42, .92)]
    # hard acceleration presses the teeth together: (start [s], end [s])
    pulls = [(2.44, 2.9)]
    hz, db, second_db = curves(sum(GEAR_MESH, []))
    rough = np.maximum(.07, sum(r * span(start, end, fade_s=.05) for start, end, r in bumps))
    turn = 2 * np.pi * np.cumsum(hz / teeth * (1 + .15 * wobble(12))) / SR
    play = 1 - .35 * sum(span(start, end) for start, end in pulls)
    waver = play * np.clip(.1 - hz / 30000, .012, .045)  # steadier at speed
    jolts = .03 * rough * wobble(40) + .03 * rough ** 2 * wobble(22)
    mesh = 2 * np.pi * np.cumsum(hz * (1 + waver * np.sin(turn) + jolts)) / SR
    beat = unit(amp(-4 * play * np.cos(turn + .4) + (2.5 + 1.5 * rough) * wobble(30)))
    smear = np.sqrt(1 - rough) + np.sqrt(rough) * fuzz(200)
    first = amp(db + 4 - 12 * rough ** 2) * smear * np.exp(1j * mesh)
    second = amp(second_db) * (.45 + .9 * fuzz(260)) * np.exp(2j * mesh)
    axle = .42 * mesh  # slower mesh of the differentials
    differential = play * amp(db - 17.5) * fuzz(50) * np.exp(1j * axle)
    differential += amp(db - 9.5) * (1.4 + 0.77 * fuzz(40)) * np.exp(2j * axle)
    running = sum(span(rows[0][0], rows[-1][0]) for rows in GEAR_MESH)
    return (first + second + differential).imag * beat * running


def buggy():
    """Tyre noise, drivetrain and pebble raps travel with the car."""
    rattle_db, rumble_db, hiss_db = tyre_levels()
    ground = tyres(rattle_db, rumble_db, hiss_db)
    tones = gears() + wheelspin() + regrip() + pebbles() + whistle(rattle_db)
    streams = rasp(rattle_db) + amp(2.5) * np.vstack([tones, amp(-4) * trunk_echoes(tones)])
    return ground + at_ports(streams, alike=.94, shade_db=1)


def scene():
    return buggy() + grit() + crumbs() + clod() + surroundings()


def record(dry):
    """Peaks round off near full scale, the sound drops out briefly, and the top treble is cut."""
    drop_start_s, drop_end_s, top_hz = 6.879, 6.911, 16100
    gate = np.clip(np.maximum((drop_start_s - TIME_S) / .0001, (TIME_S - drop_end_s) / .0015), .004, 1)
    rounded = dry / (1 + np.abs(dry) ** 6) ** (1 / 6)
    return filtered(rounded * gate, lambda hz: hz < top_hz)


dry = scene()
out = record(dry)
output_pcm(out)
```